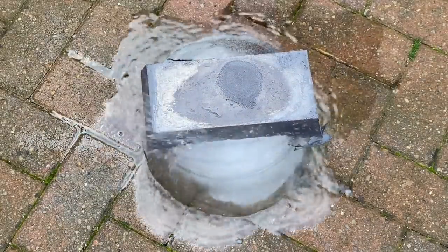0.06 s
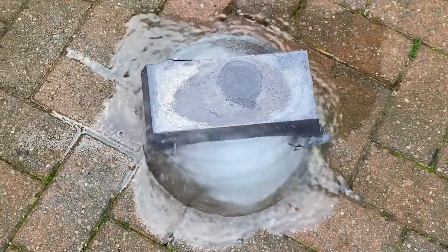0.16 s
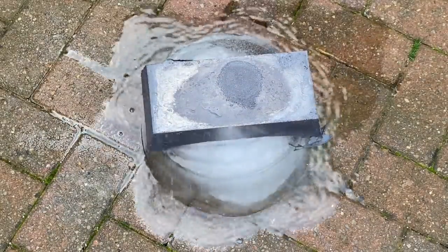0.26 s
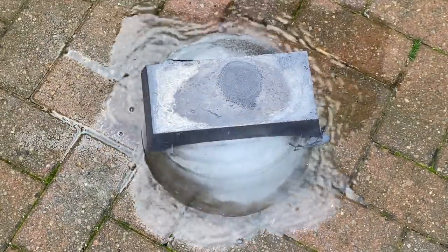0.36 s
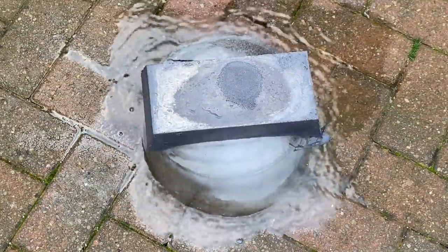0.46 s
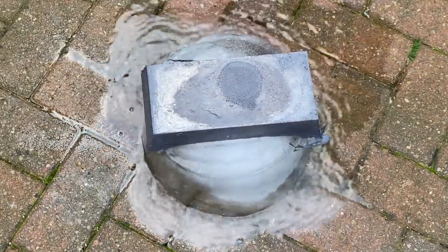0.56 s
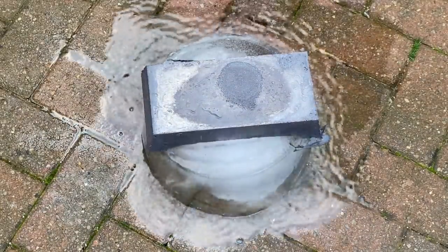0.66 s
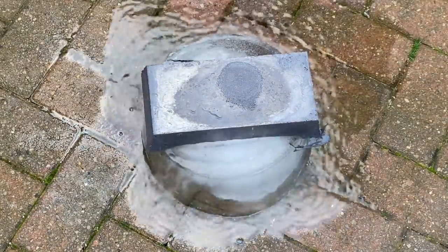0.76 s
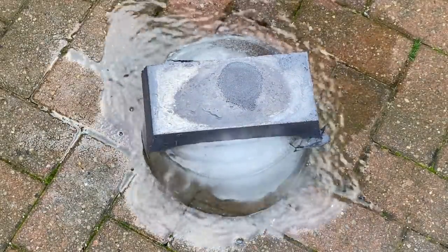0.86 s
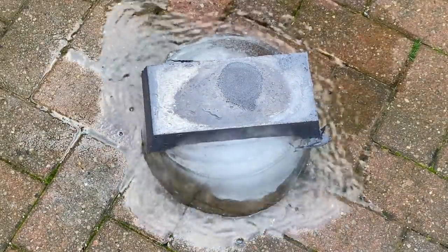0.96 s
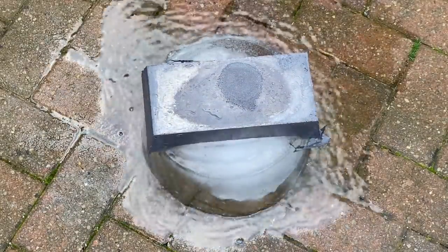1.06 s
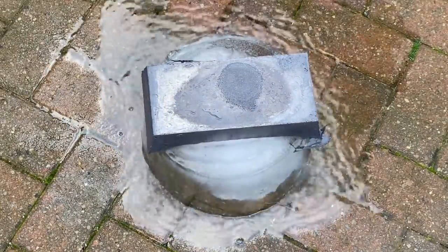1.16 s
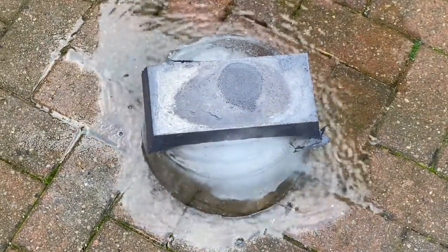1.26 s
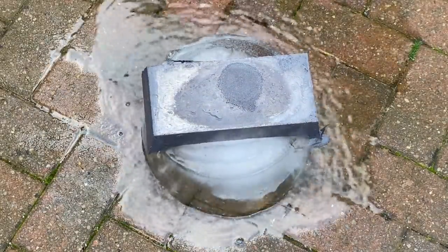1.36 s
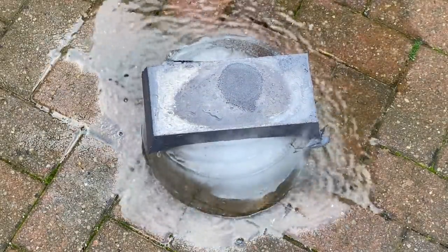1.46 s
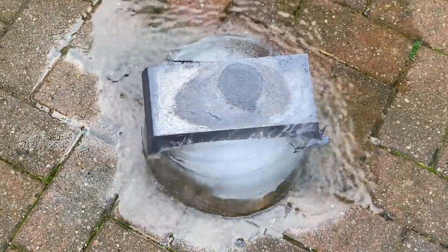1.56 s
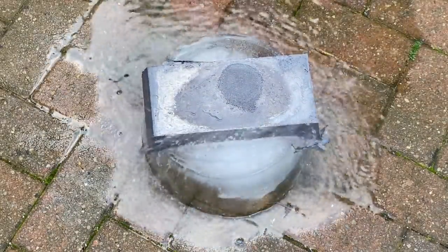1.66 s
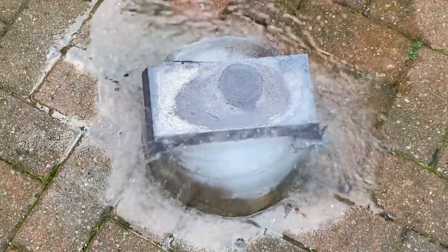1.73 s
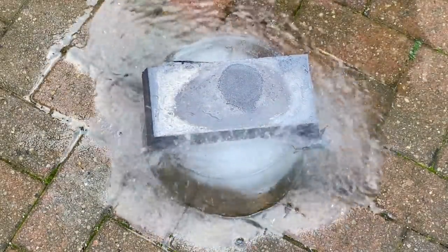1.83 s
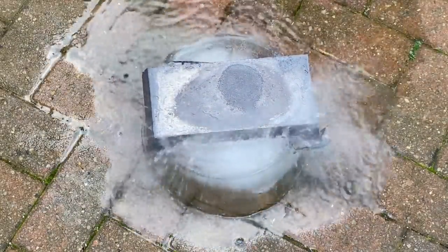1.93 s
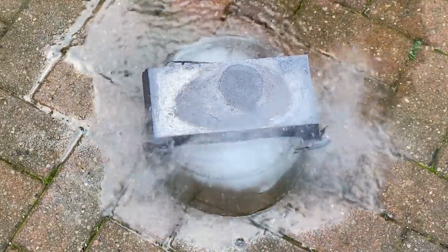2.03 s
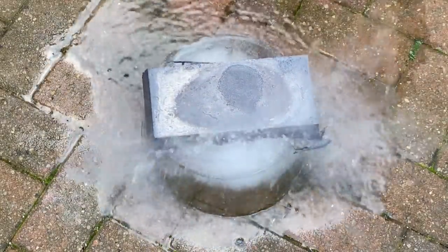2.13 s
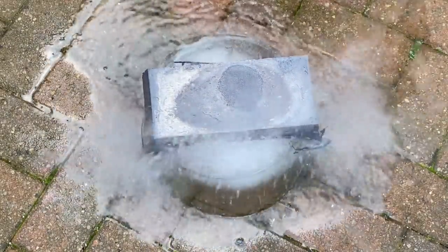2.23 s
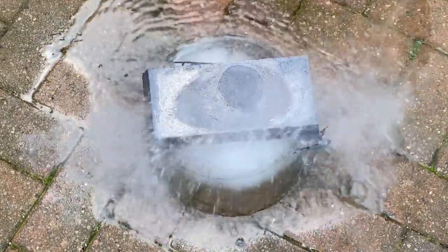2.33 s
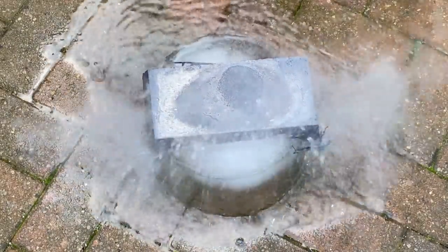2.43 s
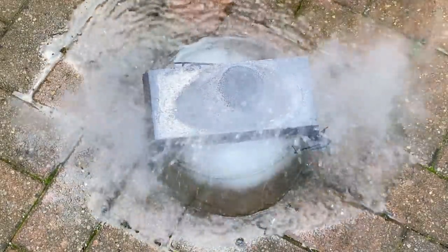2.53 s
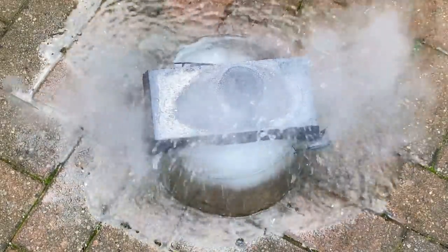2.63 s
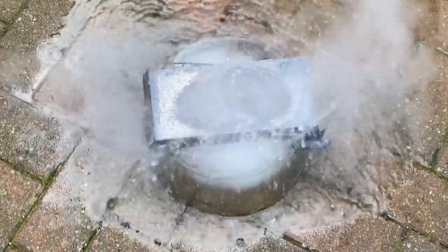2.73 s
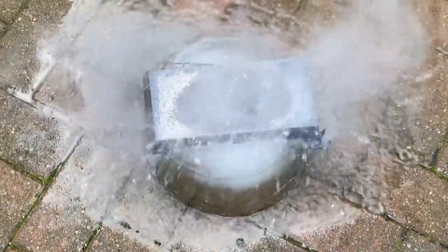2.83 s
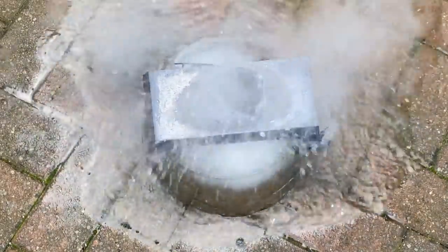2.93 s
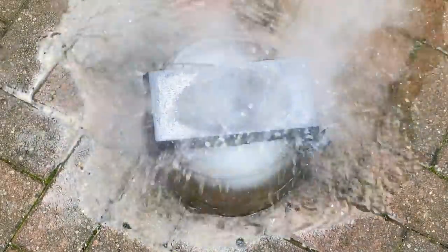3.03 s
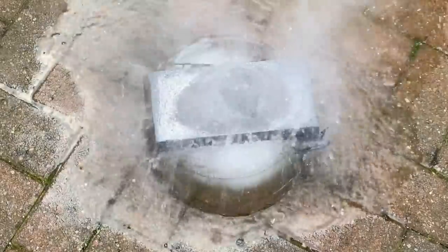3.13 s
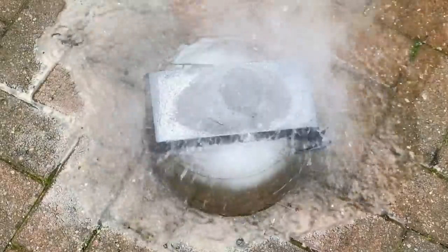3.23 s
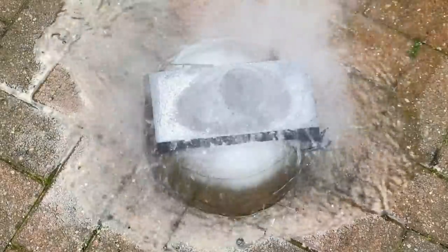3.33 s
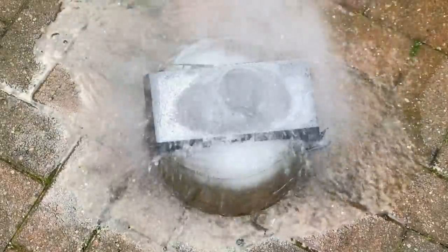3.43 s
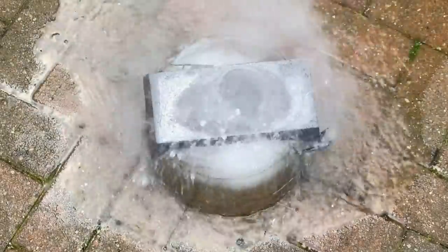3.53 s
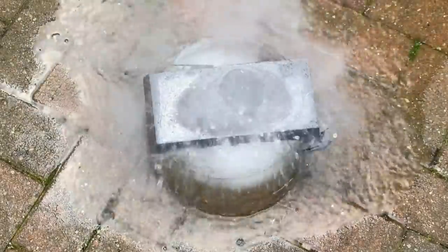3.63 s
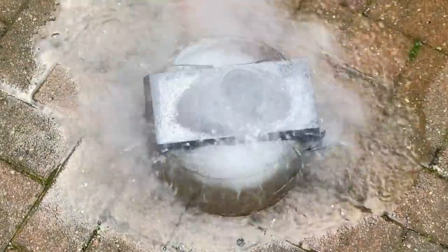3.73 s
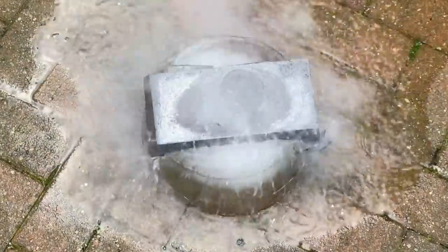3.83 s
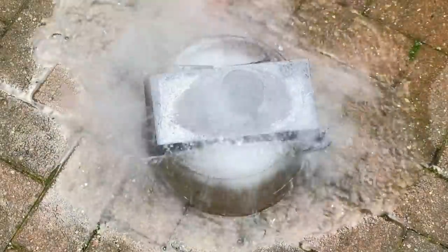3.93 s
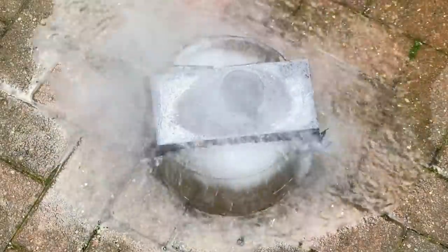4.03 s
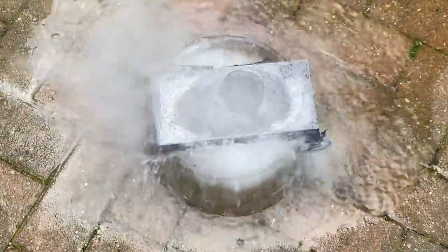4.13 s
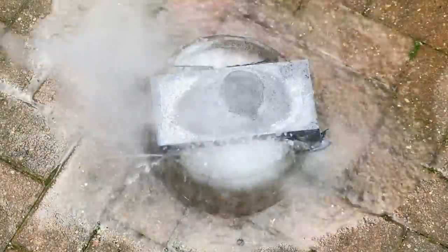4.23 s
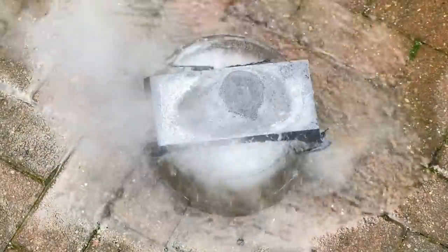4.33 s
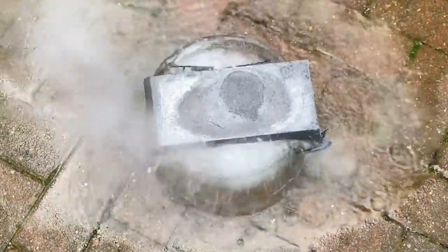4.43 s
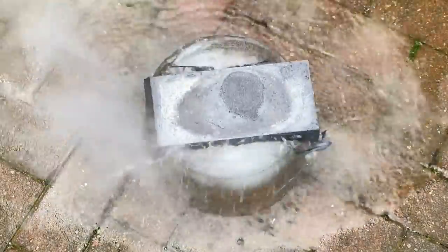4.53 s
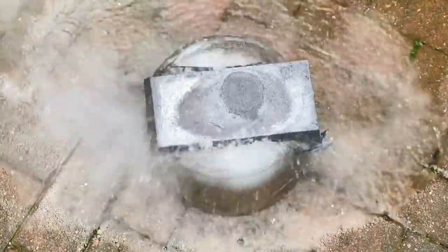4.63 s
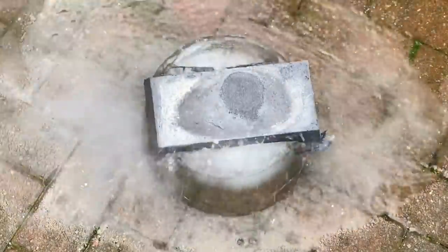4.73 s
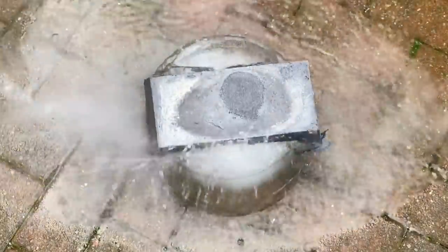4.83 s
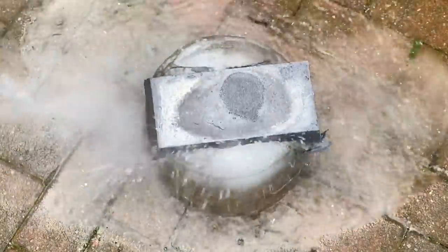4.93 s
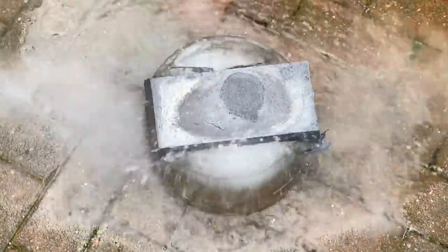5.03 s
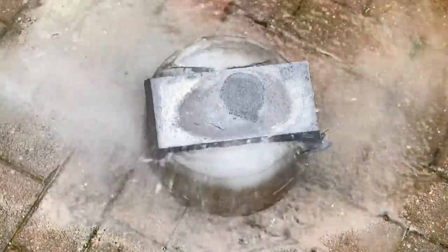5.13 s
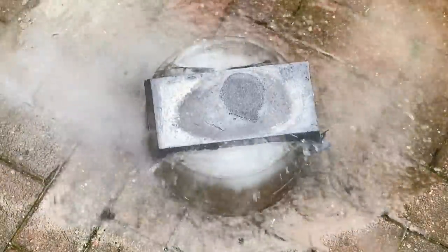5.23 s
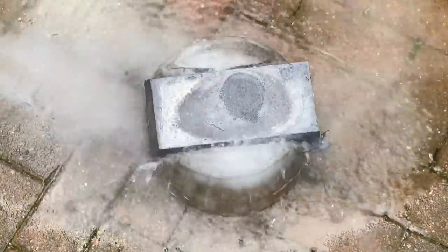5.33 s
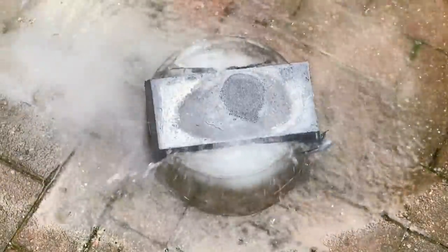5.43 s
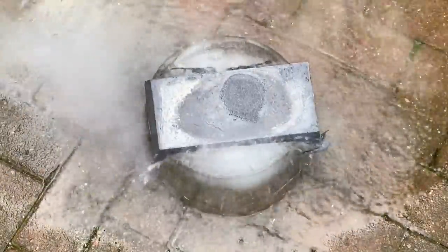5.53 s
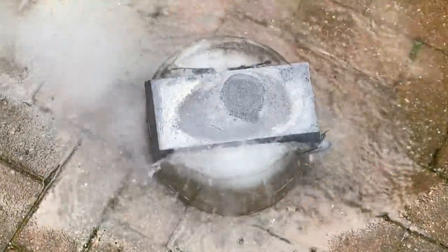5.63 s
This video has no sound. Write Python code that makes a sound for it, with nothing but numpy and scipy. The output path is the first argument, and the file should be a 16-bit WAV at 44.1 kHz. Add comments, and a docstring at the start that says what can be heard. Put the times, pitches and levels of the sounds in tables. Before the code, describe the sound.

Water hisses finely over a hot metal block, then boils hard with gritty steam spurts, deep bubbling and crackling spits that continue unevenly.

```python
"""Water on hot metal

Water runs over a hot metal ingot and its mould on wet paving. An even sizzle, made of crackling noise, comes first.
Then the water boils: big steam bubbles throb at low pitches and splash, and trapped air hums under the mould.
Steam spurts as gritty bursts of noise, about ten a second, and droplets pop as short spits with a fizzing tail.
A far rumble lies beneath. Two microphone ports hear it all, with the likeness between them set by frequency.
"""
import sys
import numpy as np
from scipy import signal
from scipy.fft import rfft, irfft, next_fast_len
from scipy.io import wavfile
from scipy.ndimage import uniform_filter1d, map_coordinates

SR = 44100
rng = np.random.default_rng(int(sys.argv[2]) if len(sys.argv) > 2 else 0)


def wav_out(sig):
    """Save sig, one row per channel (or a flat mono array), as 16-bit PCM at SR to the path in sys.argv[1]."""
    wavfile.write(sys.argv[1], SR, np.round(np.clip(np.atleast_2d(sig).T, -1, 1) * 32767).astype(np.int16))


N = 250488

# Base level of the fine sizzle: t/s, level/dB
SIZZLE_LEVEL = [(0.0, -32.5), (1.3, -31), (1.66, -27), (2.3, -25), (2.8, -24.5), (3.18, -29.5),
                (4.0, -29.5), (5.68, -30.5)]
# Colours of the steady sounds and of the jets, as relative density: f/Hz, level/dB (per Hz)
SIZZLE_COLOUR = [(300, -12), (1000, -3), (3000, -3), (5200, -2), (7500, .5), (10000, 0), (12000, -1.5),
                 (16000, -5.5)]
STEAM_COLOUR = [(400, -11), (900, -2), (1700, -3), (2300, -4), (3200, -2.5), (5200, -4), (7000, -3),
                (16000, -19.5)]
SEETHE_COLOUR = [(60, -34), (120, -2), (160, 2), (290, -0.5), (450, -7), (750, -10), (1500, -27)]
THROB_COLOUR = [(30, -37), (60, -12), (95, 1), (130, -5.5), (250, -28.5)]
RUMBLE_COLOUR = [(20, -36.5), (45, -3.5), (80, -2), (230, -8), (350, -15), (700, -16.5), (2000, -28)]
JET_COLOUR = [(400, -15), (900, -4), (1500, -1.5), (2200, -3.5), (3200, 1.5), (4500, -1.5), (5200, -9.5),
              (7000, -7.5), (16000, -11.5)]
# Big steam bubbles: t/s (middle), rms level/dB, length scale/s, central f/Hz, splash above throb/dB
BUBBLES = [(0.542, -37.5, 0.011, 222, 0), (0.605, -45, 0.008, 258, 4), (1.403, -29, 0.016, 161, -2),
           (1.452, -25.5, 0.029, 147.7, -0.5), (1.501, -29, 0.016, 148.4, -4.5),
           (1.544, -23.5, 0.015, 162.1, -1.5), (1.584, -21.5, 0.018, 160.5, -1.5),
           (1.677, -25, 0.023, 135.7, -5), (1.713, -23.5, 0.0247, 150, -6.5), (1.817, -23, 0.0266, 164, -5),
           (1.938, -25, 0.036, 130.2, 0), (1.991, -24.5, 0.036, 99.7, -8.5), (2.084, -22.5, 0.038, 157, -9),
           (2.123, -21, 0.017, 87.4, -14.5), (2.198, -33, 0.019, 200, 6.5),
           (2.229, -27.5, 0.0228, 99.4, -11.5), (2.3, -25.5, 0.015, 150, -2.5),
           (2.344, -30, 0.022, 140, -1.5), (2.403, -27, 0.016, 120, -3), (2.448, -23.5, 0.02, 124.8, -9),
           (2.595, -30, 0.039, 100.6, 1.5), (2.712, -22, 0.016, 160, -2.5), (2.83, -28.5, 0.033, 170, -4),
           (2.865, -25.5, 0.027, 90.5, -4), (3.006, -31.5, 0.031, 159.8, 2),
           (3.129, -23.5, 0.01, 122.5, -4.5), (3.236, -31, 0.02, 210, -9), (3.338, -26, 0.044, 100, -3.5),
           (3.44, -30.5, 0.045, 132, -8.5), (3.574, -25, 0.043, 89.1, -4), (3.779, -27.5, 0.037, 89.6, 1.5),
           (3.849, -30, 0.077, 100, -3.5), (4.008, -29, 0.018, 100.4, -2),
           (4.126, -32.5, 0.017, 89.7, -0.5), (4.228, -25.5, 0.048, 151.2, -4),
           (4.372, -27.5, 0.044, 130.3, -4.5), (4.513, -26, 0.034, 81.4, -3),
           (4.563, -26, 0.023, 111.1, -1.5), (4.68, -24.5, 0.024, 150.4, -5),
           (4.749, -25, 0.06, 98.6, -10.5), (4.885, -26, 0.0199, 80.8, -1.5),
           (4.992, -27.5, 0.039, 129.4, -1), (5.165, -28.5, 0.038, 109.6, -1),
           (5.225, -25, 0.048, 96.4, -7.5), (5.343, -30.5, 0.015, 120, -1.5),
           (5.419, -34, 0.033, 128.6, 0.5), (5.59, -24, 0.0483, 100.3, -5),
           (5.65, -27.5, 0.056, 91.2, -7.5)]
# Steam jets: t/s (middle), rms level/dB, length scale/s, treble above body/dB
STEAM_JETS = [(1.446, -31, 0.022, -6.5), (1.583, -26.5, 0.0098, -25.5), (1.771, -30, 0.017, -1),
              (1.821, -29, 0.0088, -10.5), (2.033, -23, 0.022, 4.5), (2.148, -23.5, 0.028, 1),
              (2.213, -28, 0.018, 3.5), (2.26, -24, 0.026, -4), (2.392, -25.5, 0.025, 5.5),
              (2.453, -27, 0.024, 8), (2.502, -19.5, 0.03, 3), (2.614, -25.5, 0.022, 2),
              (2.675, -21.5, 0.041, 3.5), (2.763, -22.5, 0.029, 0), (2.864, -23.5, 0.043, 1),
              (2.91, -19, 0.033, 4.5), (3.016, -25.5, 0.02, 1), (3.069, -23.5, 0.022, 1.5),
              (3.227, -25.5, 0.024, 2), (3.536, -26, 0.032, 1), (3.675, -24.5, 0.018, -0.5),
              (3.82, -25.5, 0.0082, -6), (3.938, -25.5, 0.014, 1), (4.015, -32, 0.03, -17.5),
              (4.064, -27, 0.022, 6), (4.193, -23, 0.028, 1.5), (4.452, -23, 0.026, -2),
              (4.529, -21.5, 0.014, -2), (4.554, -24.5, 0.0306, -3), (4.628, -26.5, 0.0783, -3.5),
              (4.691, -24.5, 0.019, -5), (4.747, -25, 0.0091, 4), (4.828, -27.5, 0.023, -8),
              (4.858, -21.5, 0.034, 3.5), (4.889, -23.5, 0.031, -4), (4.953, -25, 0.054, 1.5),
              (5.132, -25, 0.014, 10), (5.191, -32, 0.0313, -16), (5.221, -27, 0.0098, 0),
              (5.389, -30, 0.0395, -16.5), (5.521, -24, 0.011, 2)]
# Air trapped under the mould: t/s (middle), central f/Hz, rms level/dB, length scale/s
TRAPPED_AIR = [(1.45, 519.4, -32, 0.016), (1.492, 530, -32.5, 0.027), (1.54, 520, -23.5, 0.015),
               (1.585, 520, -18, 0.019), (1.645, 535, -30, .03), (1.691, 546, -25, .018),
               (1.715, 530, -30, .014), (1.965, 470.2, -25.5, .02), (2.207, 420, -25.5, .009),
               (2.309, 710, -26, 0.02), (2.423, 785, -27, 0.0091)]
# Bursting droplets: t/s, rms level over the first millisecond/dB, f/Hz
DROPLETS = [(1.694, -19, 12180), (2.13, -15, 3000), (2.401, -15, 5800), (2.444, -14, 6500),
            (2.605, -18, 3860), (2.722, -18, 4000), (2.902, -15, 3900), (2.921, -15, 3620),
            (2.932, -15, 3420), (3.677, -18, 3910), (3.717, -17, 12500), (4.547, -17, 4240),
            (5.132, -16, 4300)]
# How the two ports compare: f/Hz, likeness (0 to 1), phase between them/rad
PORT_LIKENESS = [(60, .96, 0), (330, .88, 0), (520, .25, 0), (750, .5, 0), (1100, .85, 0), (1500, .995, 0),
                 (2100, .995, 0), (2500, .8, .45), (4200, .8, .5), (5000, .35, 1.6), (7300, .45, 2.7),
                 (8300, 1, np.pi), (11500, 1, np.pi), (12300, .45, 3.7), (14000, .4, 4.8),
                 (14700, .45, 5.9), (16000, .7, 6.2)]
# Left level minus right level: f/Hz, level/dB
PORT_TILT = [(60, -1), (500, .4), (2000, 0), (3000, -1.5), (6000, 0)]

BOILS_S = 1.37  # when the water starts to boil
TOP_HZ = 15750  # the sound holds nothing from here up
WINDOW = 8192  # samples of room for one jet, bubble or hum
HALF_S = WINDOW / 2 / SR  # from the window's start to the event's middle


def amp(db):
    """Turn decibels into a plain multiplier."""
    return 10 ** (np.asarray(db) / 20)


def unit(x):
    """Scale a signal to rms 1."""
    return x / np.sqrt(np.mean(x ** 2) + 1e-20)


def along(points, hz, axis=1):
    """Read one column of a table over frequency, on a log axis."""
    rows = np.transpose(points)
    return np.interp(np.log(hz + 1), np.log(rows[0] + 1), rows[axis])


def level_curve(rows):
    """Join the levels in a time table into one value per sample."""
    seconds, level_db = np.transpose(rows)
    return np.interp(np.arange(N) / SR, seconds, level_db)


def wobble(rate, size=N):
    """Draw a smooth random curve through rate knots a second."""
    knots = rng.standard_normal(size // 16)
    used = knots[:int(size * rate / SR) + 4]
    return map_coordinates(used, [np.arange(size) * rate / SR])


def filtered(x, response):
    """Multiply the spectrum of x by a complex response of frequency."""
    length = next_fast_len(x.shape[-1] + 4096)
    spectrum = rfft(x, length) * response(np.fft.rfftfreq(length, 1 / SR))
    return irfft(spectrum, length)[..., :x.shape[-1]]


def resonance(centre_hz, sharp):
    """Ring around one frequency, with gain 1 there; a larger sharp rings longer."""
    def response(hz):
        damping = 1j * hz * centre_hz / sharp
        return damping / (centre_hz ** 2 - hz ** 2 + damping)
    return response


def crackle(grain_db, rate, size=N):
    """Make noise from uneven little bursts, using rate knots a second; both paths share the bursts."""
    return rng.standard_normal((2, size)) * amp(grain_db * wobble(rate, size=size))


def rush(source, colour, patchy_db):
    """Colour a noise, vary it in patches of time and frequency, and set it to rms 1."""
    grid = signal.stft(source, nperseg=512)[2]
    patches = rng.standard_normal(grid.shape[1:])
    patches = uniform_filter1d(uniform_filter1d(patches, 8, 0), 8, 1)
    patched = signal.istft(grid * amp(patchy_db * unit(patches)), nperseg=512)[1][:, :N]
    return unit(filtered(patched, lambda hz: amp(along(colour, hz))))


def swell(length, rise, fall, edge):
    """Shape a bell for one event; a larger edge gives a flatter top and squarer sides."""
    t = np.arange(-WINDOW // 2, WINDOW // 2) / SR
    side = length * np.where(t < 0, rise, fall)
    return np.exp(-np.abs(t / side) ** edge)


def shaped(x, bell):
    """Put x under the bell, with rms 1 at the bell's top."""
    return x * bell * np.sqrt(np.mean(bell ** 2) / np.mean((x * bell) ** 2))


def add(track, s, sound):
    """Lay a sound on the track from time s."""
    start = round(s * SR)
    track[:, start:start + sound.shape[1]] += sound[:, :N - start]


def boiling(before_db, after_db, rise_s):
    """Climb from a quiet level towards a boiling level once the water boils."""
    since = np.maximum(np.arange(N) / SR - BOILS_S, 0)
    return after_db + (before_db - after_db) * np.exp(-since / rise_s)


def sizzle(sputter, spent):
    """Fine bursts of bright noise follow the uneven boiling and weaken when water smothers the metal."""
    level_db = level_curve(SIZZLE_LEVEL) + 0.78 * sputter - 0.41 * spent
    return amp(level_db) * rush(crackle(grain_db=1.0, rate=900), SIZZLE_COLOUR, patchy_db=1.5)


def steam(sputter, spent):
    """Coarser bursts of noise sputter with the sizzle and grow when the water boils."""
    level_db = boiling(before_db=-55, after_db=-32, rise_s=0.48) + 2.0 * sputter - 0.46 * spent
    return amp(level_db) * rush(crackle(grain_db=3.5, rate=400), STEAM_COLOUR, patchy_db=2.5)


def seethe():
    """Low boiling noise rises quickly and wavers by itself."""
    level_db = boiling(before_db=-49, after_db=-34.5, rise_s=0.11) + 1.9 * wobble(22.07)
    return amp(level_db) * rush(crackle(grain_db=2.0, rate=110), SEETHE_COLOUR, patchy_db=1.5)


def deep_throb():
    """Very low noise throbs in slow, uneven bursts once the water boils."""
    level_db = boiling(before_db=-47.5, after_db=-34, rise_s=0.5)
    return amp(level_db) * rush(crackle(grain_db=4.0, rate=19), THROB_COLOUR, patchy_db=0.8)


def far_rumble():
    """Low noise from far away keeps one average level."""
    return amp(-43.5) * rush(crackle(grain_db=2.2, rate=21), RUMBLE_COLOUR, patchy_db=0.5)


def bed(jets):
    """Add the steady sounds; uneven boiling moves the sizzle and the steam together."""
    sputter = wobble(18)
    jet_strength = unit(uniform_filter1d(np.abs(jets[0]), size=1500))
    spent = np.roll(jet_strength, 1900)  # water smothers the metal just after a jet
    return sizzle(sputter, spent) + steam(sputter, spent) + seethe() + deep_throb() + far_rumble()


def glugs():
    """Each bubble pulses at a drifting pitch; its crests knock the water into a short dull ring."""
    track = np.zeros((2, N))
    for s, db, length, hz, splash_db in BUBBLES:
        drifting_hz = [hz * (1 + 0.0812 * wobble(44.8, size=WINDOW)) for path in range(2)]
        turn = 2 * np.pi * np.cumsum(drifting_hz, axis=1) / SR
        throb = np.sin(turn) - 0.26 * np.cos(2 * turn)  # the second wave sharpens the crests

        crests = amp(13 * np.sin(turn) + 1.9 * wobble(hz, size=WINDOW))
        knocks = crests * (1 + 7.2 * crackle(grain_db=2.5, rate=310, size=WINDOW))
        ring = resonance(centre_hz=285 * np.exp(0.089 * rng.standard_normal()), sharp=3.24)
        dip = resonance(centre_hz=540, sharp=1.8)
        body = resonance(centre_hz=420, sharp=0.6)
        splash = filtered(knocks, lambda f: (ring(f) - 0.4 * dip(f)) * body(f))

        bell = swell(length, rise=0.73, fall=0.67, edge=1.25)
        sound = amp(db) * shaped(throb, bell) + amp(db + splash_db) * shaped(splash, bell)
        add(track, s - HALF_S, sound)
    return track


def spurts():
    """Each jet spits tiny droplets through a narrowing gap, so its tone rises; then the water chokes it."""
    track = np.zeros((2, N))
    for s, db, length, treble_db in STEAM_JETS:
        gap_hz = 2500 * np.exp(0.051 * treble_db + 0.13 * rng.standard_normal())
        droplets = 1 + 6.6 * (rng.random(size=WINDOW) < 0.008)  # rare strong grains
        grains = crackle(grain_db=2.5, rate=600, size=WINDOW) * droplets

        def through_gap(centre_hz):
            gap = resonance(centre_hz, sharp=3.5)

            def response(hz):
                lift_db = treble_db * along([(1400, 0.11), (4200, 1)], hz)
                return (1 + 0.55 * gap(hz)) * amp(along(JET_COLOUR, hz) + lift_db)
            return unit(filtered(grains, response))

        wide = through_gap(gap_hz / 1.25)
        narrow = through_gap(gap_hz * 1.25)
        t = np.arange(-WINDOW // 2, WINDOW // 2) / SR
        closing = np.clip(0.5 + t / length, 0, 1)
        jet = wide + closing * (narrow - wide)
        add(track, s - HALF_S, amp(db) * shaped(jet, swell(length, rise=0.69, fall=0.7, edge=3.35)))
    return track


def hollow():
    """Trapped air hums in broken, breathy blobs around the pitch of its space."""
    track = np.zeros((2, N))
    for s, hz, db, length in TRAPPED_AIR:
        turn = 2 * np.pi * np.cumsum(hz * (1 + 0.015 * wobble(23.8, size=WINDOW))) / SR

        def breath():
            return wobble(68.4, size=WINDOW) + 0.44 * wobble(449, size=WINDOW)

        hum = np.array([breath() * np.sin(turn) + breath() * np.cos(turn) for path in range(2)])
        add(track, s - HALF_S, amp(db) * shaped(hum, swell(length, rise=0.67, fall=1.0, edge=1.25)))
    return track


def pops():
    """A droplet bursts as a short spit with a fizzing tail around its pitch and pings the metal faintly."""
    track = np.zeros((2, N))
    t = np.arange(2048) / SR
    ping = resonance(centre_hz=5620, sharp=80)
    fade = amp(-60 * t / 0.0025) + 0.33 * amp(-60 * t / 0.052)  # quick spit, then slower fizz
    onset = np.minimum(t / 0.0001, 1)
    for s, db, hz in DROPLETS:
        spit = rng.standard_normal((2, len(t))) * fade * onset
        pitch = resonance(hz, sharp=1.7)
        burst = filtered(spit, lambda f: pitch(f) * (1 + 2.5 * ping(f)))
        first_ms_rms = np.sqrt(np.mean(burst[:, :44] ** 2))
        add(track, s - 0.0006, amp(db) * burst / first_ms_rms)
    return track


def scene():
    """Mix all sounds on two paths: one that both ports share and a scattered one."""
    jets = spurts()
    return bed(jets) + glugs() + jets + hollow() + pops()


def record(dry):
    """Blend the paths by likeness, set phase and level between the ports, leave out all from TOP_HZ up."""
    def path_gains(hz):
        turn = np.arccos(np.clip(along(PORT_LIKENESS, hz), 0, 1)) / 2
        return np.array([np.cos(turn), np.sin(turn)])

    def left_right_gains(hz):
        half_phase = np.exp(0.5j * along(PORT_LIKENESS, hz, axis=2))
        half_tilt = amp(along(PORT_TILT, hz) / 2)
        opposite = np.array([[1], [-1]])  # the right port gets the inverse of the left
        return (half_phase * half_tilt) ** opposite * (hz < TOP_HZ)

    shared, scattered = filtered(dry, path_gains)
    return filtered(np.array([shared + scattered, shared - scattered]), left_right_gains)


dry = scene()
out = record(dry)
wav_out(out)
```